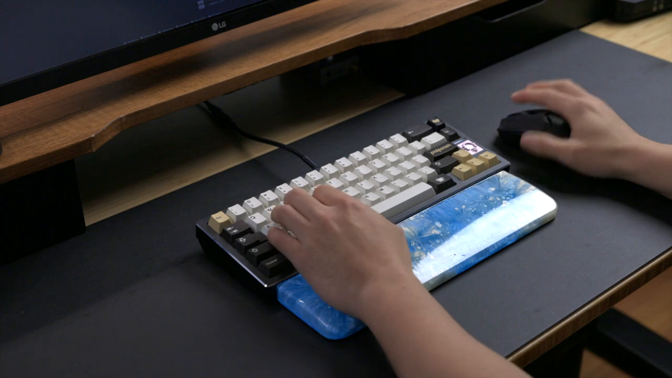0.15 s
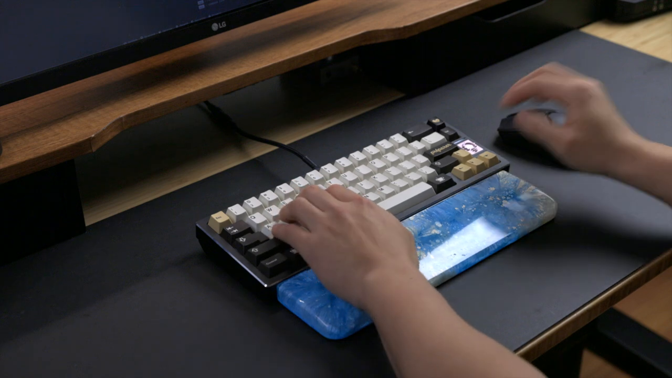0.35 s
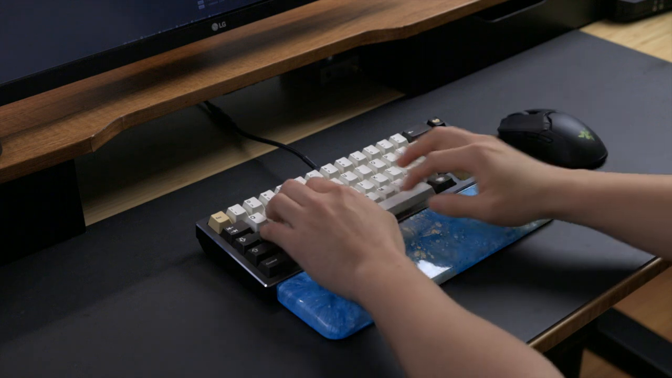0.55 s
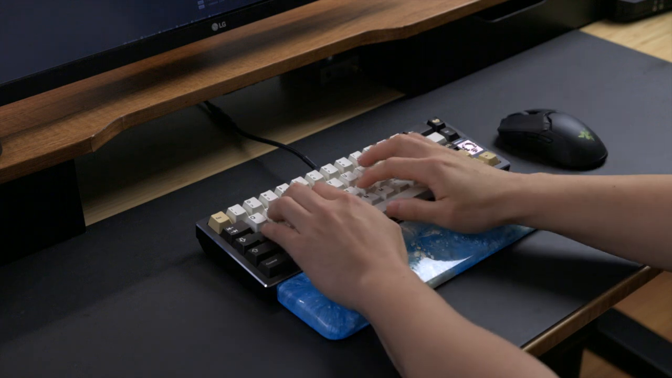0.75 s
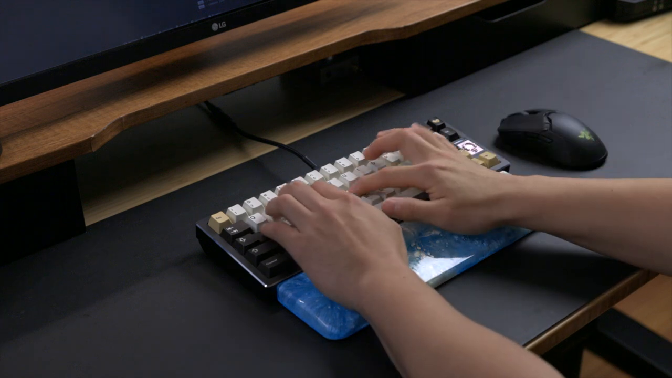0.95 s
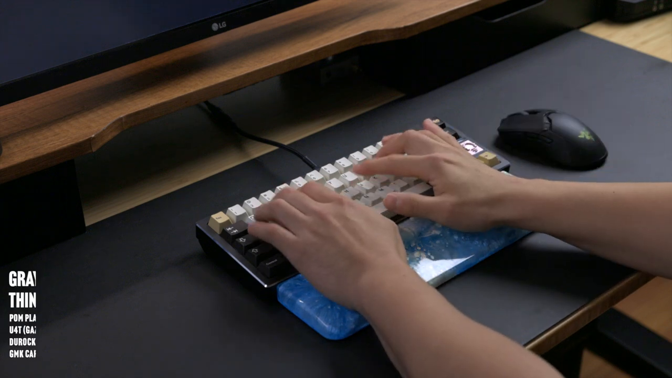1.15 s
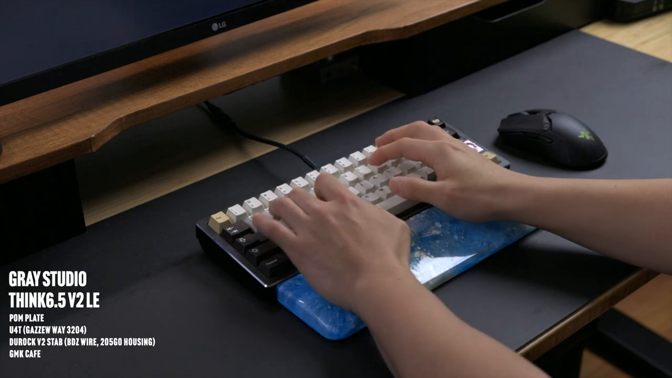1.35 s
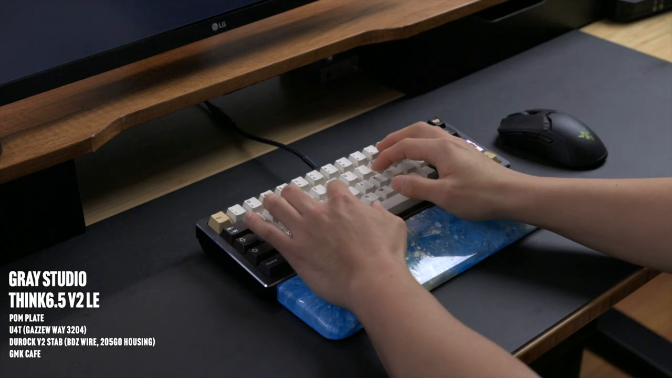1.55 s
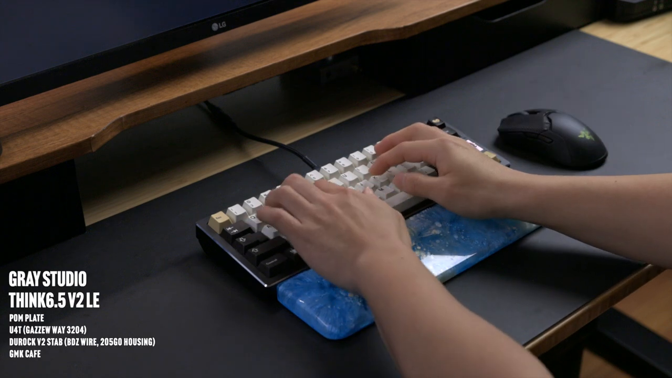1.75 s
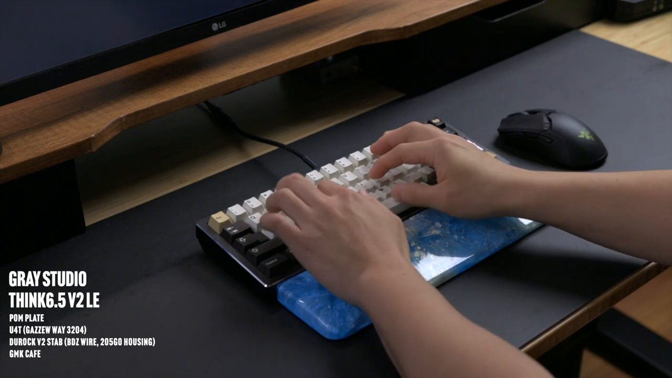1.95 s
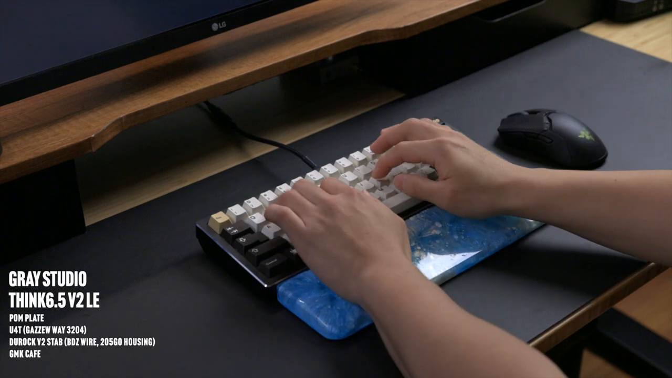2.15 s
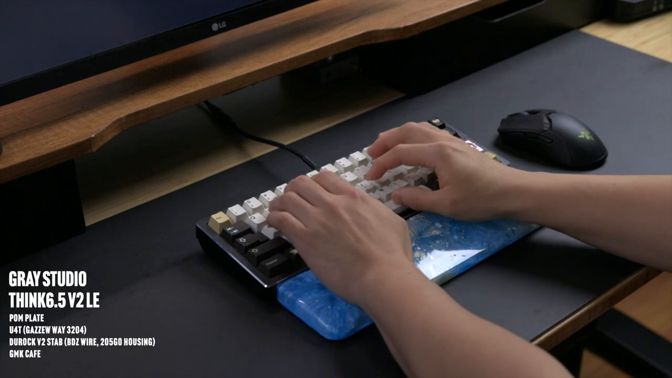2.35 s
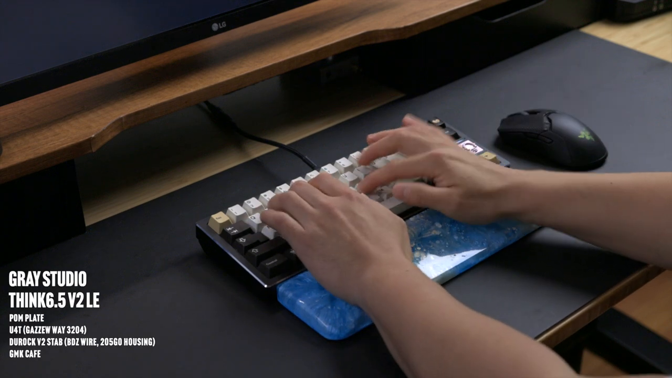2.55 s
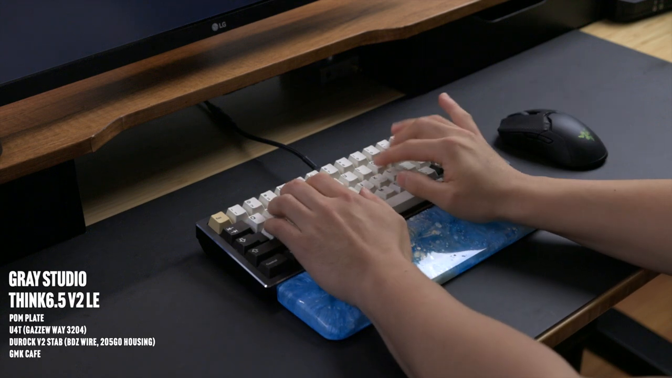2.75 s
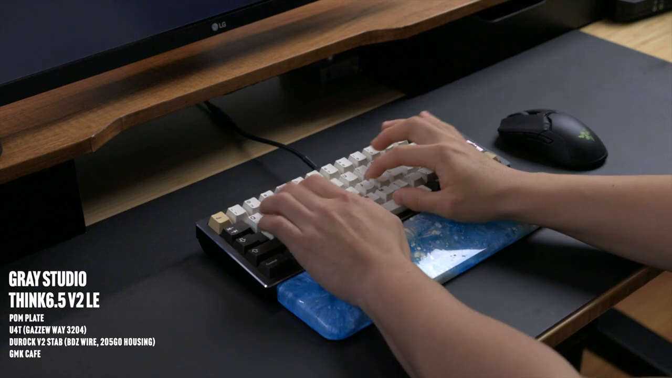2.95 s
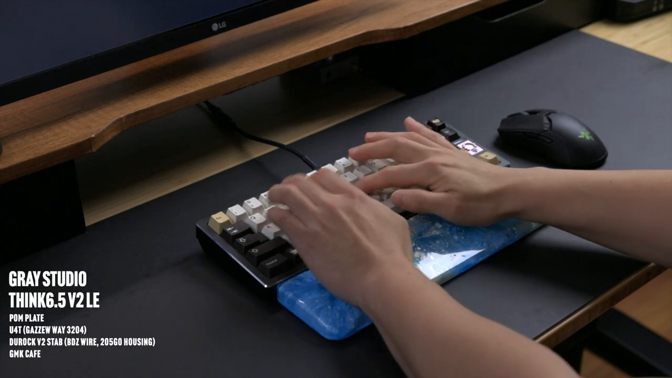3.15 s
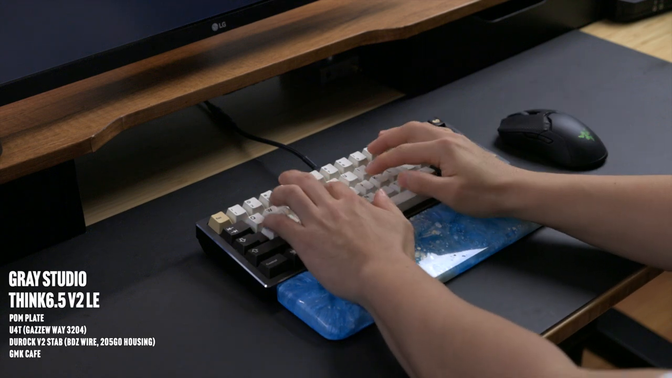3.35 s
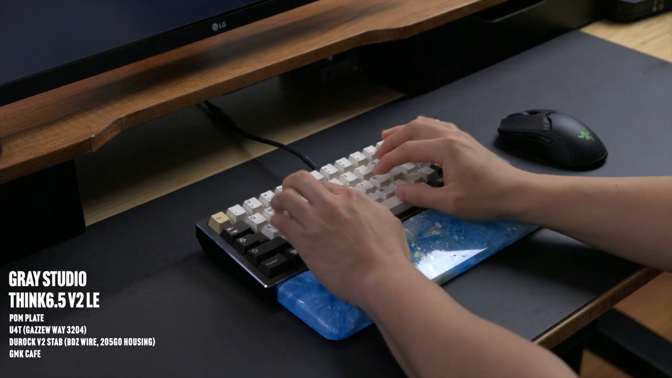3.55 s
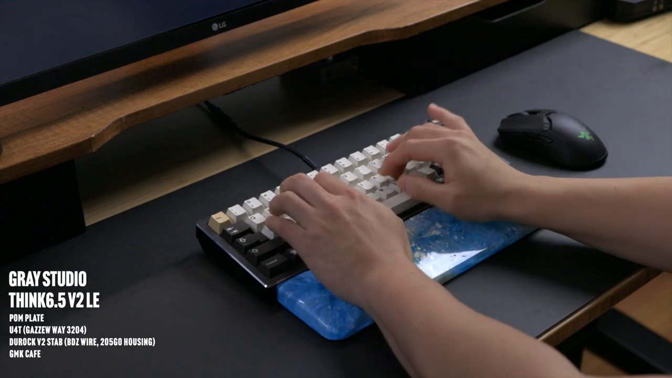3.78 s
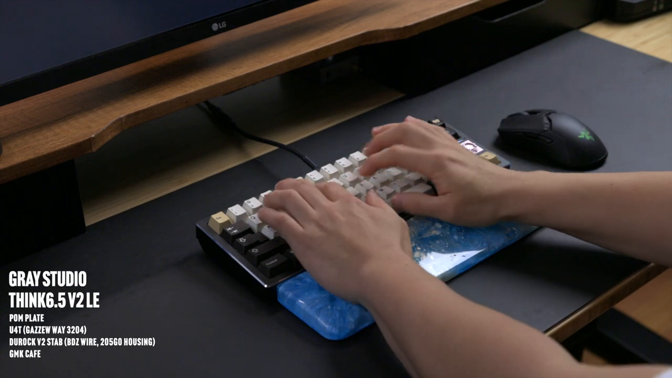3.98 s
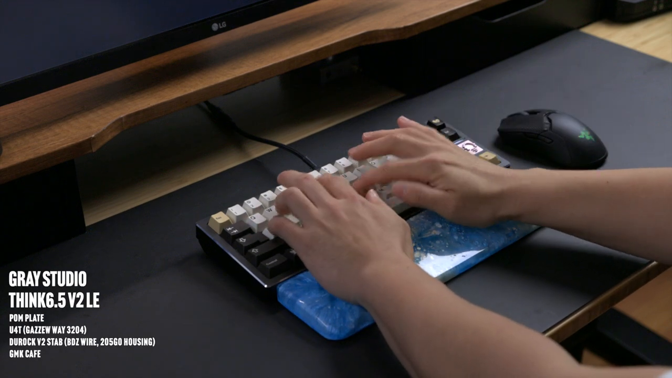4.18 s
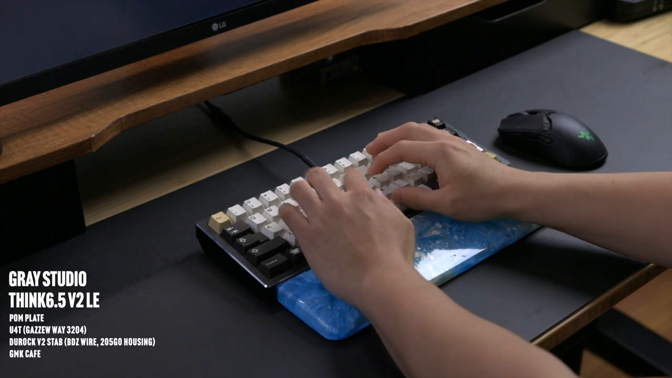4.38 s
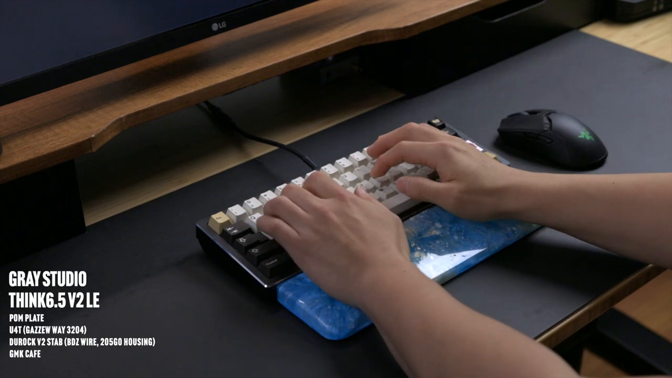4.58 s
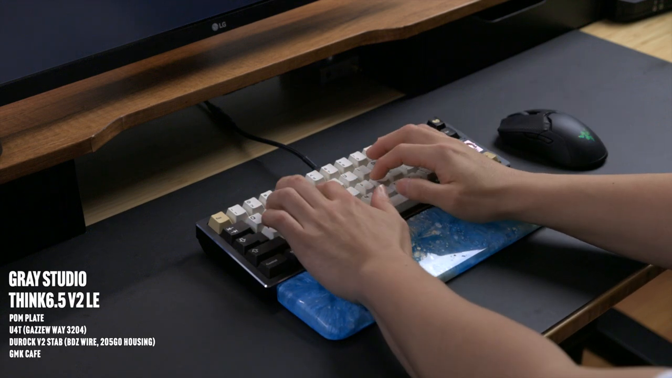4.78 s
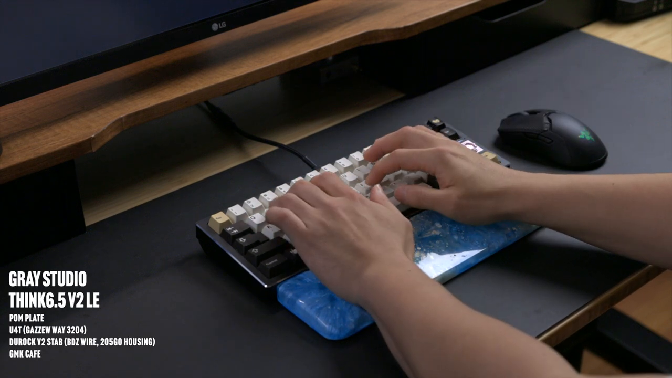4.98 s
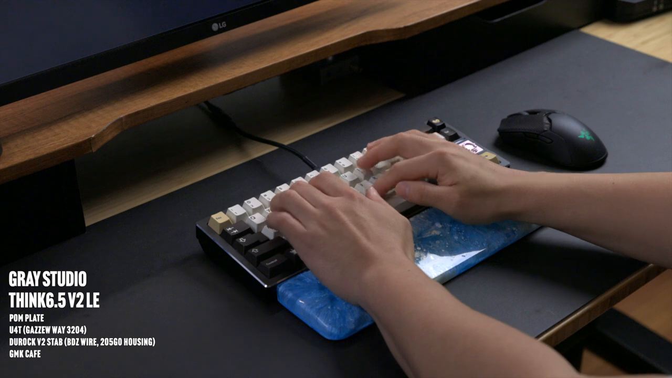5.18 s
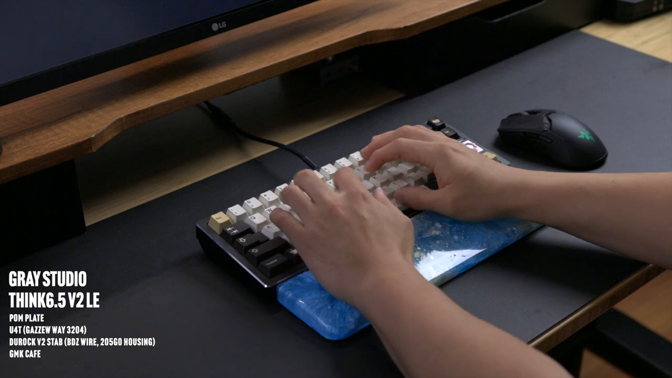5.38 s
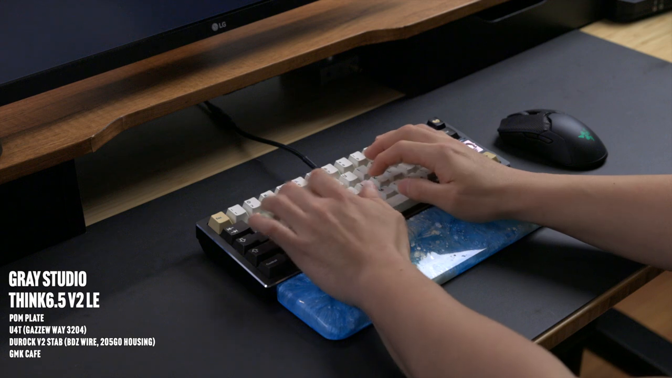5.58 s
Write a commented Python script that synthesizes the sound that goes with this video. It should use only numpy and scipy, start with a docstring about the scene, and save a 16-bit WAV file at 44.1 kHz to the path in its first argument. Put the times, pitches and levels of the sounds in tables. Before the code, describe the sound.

A faint skin rustle and tiny plastic ticks as a hand leaves a mouse, then a short quiet gap with low fan hum. From about 0.8 seconds, rapid mechanical typing runs to the end: short hollow plastic clacks, light finger taps, and fuller space-bar knocks. Close microphone, small damped room, wooden desk.

```python
"""Small damped room, wooden desk: fast typing on a mechanical keyboard close to one microphone.
Each contact rings the hollow keycap, the soft plate under the switches and the stem as decaying modes,
then thumps the desk top; shaped noise swells faintly around it and gives the rattle of loose keys and case.
A fan hums as wavering sines over noise for room air; at first a hand slides off the mouse, as grainy
noise with ticks."""
import sys
import numpy as np
from scipy import signal
from scipy.fft import rfft, irfft, next_fast_len
from scipy.io import wavfile
from scipy.ndimage import map_coordinates

SR = 44100
rng = np.random.default_rng(int(sys.argv[2]) if len(sys.argv) > 2 else 0)


def linear_from_db(decibels):
    """Turn decibels (scalar or array-like) into linear amplitude factors; 0 gives 1."""
    return 10 ** (np.asarray(decibels, float) / 20)


def generate_wav(sig):
    """Save sig (samples, or channels by samples) to the path in sys.argv[1] as 16-bit PCM at SR."""
    pcm = np.round(np.clip(np.atleast_2d(sig).T, -1, 1) * 32767).astype(np.int16)
    wavfile.write(sys.argv[1], SR, pcm)


N = 247842

# Louder letter-key contacts, some of them bounces or ringing on. Each row: start in seconds,
# cap level in dB, cap pitch in Hz, plate level in dB, Hz where the plate rings best under this key,
# stem level in dB, desk level in dB; all levels relative.
LETTER_KEYS = [(0.839, -13, 3034, -16.5, 1510, -31.0, -26), (0.9341, -18.5, 2940, -20, 1630, -33.5, -33.5),
               (0.9785, -12, 3010, -15, 1390, -25.5, -26), (1.0643, -13, 3100, -24.5, 1610, -25, -25.5),
               (1.0759, -18.5, 2950, -22, 1410, -37, -31), (1.1682, -24.5, 3000, -35.5, 1580, -38, -47),
               (1.258, -13.5, 3070, -22, 1750, -30, -23.5), (1.383, -17, 3180, -26.5, 1740, -30, -26.5),
               (1.4029, -18, 3020, -18, 1500, -31.5, -21.5), (1.509, -14.5, 3210, -23, 1810, -32.5, -24),
               (1.5291, -16, 2890, -18.5, 1750, -26.5, -54), (1.6586, -17.5, 3100, -20.5, 1525, -30.5, -27),
               (1.6832, -20.5, 3010, -28, 1800, -40, -57), (1.7508, -24.5, 3100, -28, 1460, -42.5, -34),
               (1.9026, -25.5, 3150, -30, 1550, -46, -45), (2.02, -19.5, 3130, -25, 1800, -38.5, -29),
               (2.089, -17, 3200, -31, 1780, -33, -32.5), (2.121, -20.5, 3050, -31, 1970, -37.5, -44),
               (2.1946, -23.5, 2920, -29, 1840, -43.5, -30), (2.2393, -24.5, 2900, -24, 1580, -43.5, -49),
               (2.3611, -20.5, 2970, -17.5, 1390, -42, -47), (2.4349, -15.5, 3080, -21, 1780, -33, -26),
               (2.4754, -19, 2930, -24.5, 1430, -40, -35), (2.577, -12.5, 3140, -22, 1860, -30.5, -25),
               (2.6563, -14.5, 3000, -24, 2000, -27.5, -32), (2.74, -11.5, 3080, -19.5, 1800, -30, -24.5),
               (2.8202, -14.5, 3050, -38, 1460, -35, -32), (2.9185, -15, 3140, -31, 1780, -28, -24),
               (3.015, -25.5, 2950, -23.5, 1430, -49, -56), (3.0205, -23, 3110, -40, 1710, -39.0, -45),
               (3.025, -35, 3300, -38, 1700, -44, -59), (3.1143, -16, 3320, -22.5, 1510, -30, -59),
               (3.1324, -19, 2920, -21.5, 1490, -40, -32), (3.2275, -17, 2980, -19.5, 1450, -38, -31),
               (3.2467, -26, 3300, -23.5, 1480, -38, -58), (3.3349, -13.5, 2920, -35, 1900, -25.5, -27),
               (3.5174, -16.5, 3350, -21.5, 1470, -36.5, -32), (3.6054, -14.5, 3000, -20, 1600, -33, -26),
               (3.635, -29, 3270, -28, 1480, -46, -62), (3.6707, -26.5, 3230, -27.5, 1860, -44.5, -32.5),
               (3.7303, -17.5, 3207, -31, 1930, -38, -23.5), (3.795, -20, 3330, -21, 1930, -35, -58),
               (3.879, -11.5, 3010, -12, 1510, -25.5, -25.5), (3.9784, -12, 2980, -13, 1420, -30.5, -23.5),
               (4.0021, -18, 2930, -20, 1420, -32, -47), (4.079, -17, 3320, -18.5, 1470, -35.5, -56),
               (4.089, -16.5, 2950, -21.5, 1440, -36, -29), (4.1366, -14, 2950, -13, 1430, -36, -31),
               (4.203, -23, 3230, -23, 1520, -35.5, -31), (4.2377, -18.5, 2920, -31, 1850, -31.0, -30),
               (4.353, -15, 2990, -14.5, 1530, -31, -39), (4.4315, -19.5, 2880, -18.5, 1900, -34, -29),
               (4.5186, -16.5, 3200, -28, 1800, -42.5, -28.5), (4.6122, -17, 3020, -42, 1870, -31.5, -38),
               (4.6645, -10.5, 3020, -12.5, 1520, -23.5, -22), (4.7561, -12.5, 3100, -24, 1750, -25.5, -28),
               (4.7907, -21, 2970, -24, 1640, -43, -33), (4.8463, -18.5, 2900, -23, 1830, -41.5, -26.5),
               (4.9013, -28, 2850, -33, 1740, -44.5, -37), (4.9446, -20.5, 3160, -25.5, 1800, -41, -31.5),
               (5.0018, -14, 3070, -22, 1800, -30, -20.5), (5.094, -23, 3200, -13.5, 1700, -30.5, -36),
               (5.148, -21, 3100, -29, 1710, -39, -30.5), (5.1911, -28, 2540, -26, 1840, -37.5, -31),
               (5.2052, -23, 3010, -20, 1830, -34, -35), (5.3801, -17.5, 2900, -15.5, 1590, -31.0, -34),
               (5.4719, -13, 2780, -15.5, 1880, -24.5, -27), (5.5393, -16, 3230, -25, 1800, -34.5, -23),
               (5.6175, -20, 3080, -44, 2010, -34, -39)]
# Space bar going down, then springing back. Each row: start in seconds, cap level in dB,
# plate level in dB, Hz where the plate rings best, stem level in dB, desk level in dB; levels relative.
SPACE_BAR = [(1.76, -23.5, -12, 1490, -33, -19), (1.8899, -32, -18, 1310, -43, -18.5),
             (2.2181, -21.5, -9, 1600, -33.5, -17), (2.3262, -25.5, -10.5, 1370, -38.5, -15.5),
             (2.8138, -22, -7.5, 1580, -32.0, -16.5), (2.9307, -27.5, -12.5, 1330, -45, -15),
             (3.352, -24, -8.5, 1710, -34, -16.5), (3.4745, -18, -16.5, 1320, -33.5, -17.5),
             (3.78, -24, -10, 1610, -35.5, -18), (3.8968, -26, -10, 1340, -33.5, -13.5),
             (4.21, -32, -13, 1470, -43.0, -19.5), (4.338, -32, -16, 1290, -41, -17),
             (5.2217, -27, -11, 1540, -36, -17.5), (5.3665, -33.5, -17.5, 1280, -40, -21.5)]
# Fingers landing on caps and keys rattling lightly. Each row: start in seconds, relative levels in dB
# of cap, stem and desk.
LIGHT_TOUCHES = [(.816, -50, -55, -62), (0.967, -48, -47, -32), (1.0378, -52, -54, -42),
                 (1.246, -33, -38.5, -35), (1.362, -43, -49, -47), (1.4912, -30, -37.5, -37),
                 (1.6051, -40, -52, -33.5), (1.646, -34, -43, -29), (1.729, -50, -39.5, -57),
                 (1.8844, -33, -38, -58), (2.0017, -36.5, -46, -33), (2.069, -34, -44, -41),
                 (2.2016, -35, -36.5, -49), (2.2594, -46, -60, -35), (2.287, -39, -53, -34),
                 (2.297, -34.5, -47, -35), (2.347, -43, -44, -27.5), (2.424, -28, -38, -48),
                 (2.562, -41, -49, -38), (2.616, -41, -58, -41), (2.6418, -39, -61, -54),
                 (2.667, -44, -48, -43), (2.727, -51, -45, -34), (2.7999, -43, -32, -29.5),
                 (2.827, -36, -60, -57), (2.857, -53, -66, -34), (2.895, -41, -54, -36),
                 (2.9067, -34, -39, -32), (2.999, -45, -48, -51), (3.0078, -37, -51, -45),
                 (3.1052, -30, -39, -35.5), (3.216, -29, -38, -28.5), (3.294, -43, -66, -36),
                 (3.46, -28.5, -33, -27), (3.503, -43, -42, -50), (3.525, -58, -45, -60),
                 (3.59, -42, -43, -31), (3.6581, -43, -59, -39), (3.7597, -33.5, -35.5, -31),
                 (3.852, -36, -48, -43), (3.862, -41, -49, -46), (3.8694, -31, -39, -38),
                 (3.968, -45, -46, -29), (4.0574, -47, -47, -33), (4.1258, -42, -53, -27),
                 (4.1909, -41, -32, -28), (4.5047, -32, -41, -46), (4.513, -40, -58, -59),
                 (4.603, -42, -49, -48), (4.6557, -29, -41, -30), (4.735, -49, -51, -34),
                 (4.826, -51, -49, -32.5), (4.986, -40, -51, -71), (5.0772, -54, -44, -32),
                 (5.1034, -34, -60, -29.5), (5.524, -52, -41, -44), (5.536, -35, -47, -31),
                 (5.6069, -28, -35.5, -29)]
# Modes of switch plate and case. Each row: frequency in Hz, relative level in dB under a letter key,
# relative level in dB under a wide key, t60 in seconds.
PLATE_MODES = [(670, -30, 3, 0.018), (1170, -6.5, -6.5, 0.019), (1368, 0.5, 4.5, 0.013),
               (1482, -4.5, -4.5, 0.024), (1610, 1.5, 2, 0.012), (1800, 9.5, 11, 0.008),
               (2140, 12.5, 1, 0.0042), (2350, 9.5, -23, 0.012)]
# Modes of stem and housing plastic. Each row: as for the plate.
STEM_MODES = [(3800, 15.5, 10, 0.0018), (4530, 6, 8, 0.0064), (5040, 2, 9.5, 0.0052),
              (6150, 3.5, -4, 0.0024), (6960, -3.5, -0.5, 0.006), (7840, 0, -2, 0.0035),
              (8770, 8, 4, 0.0019), (10060, 10.5, -2, 0.0035), (10730, 3.5, -3, 0.0047),
              (12960, -11, -7, 0.004)]
# Modes of the desk top. Each row: as for the plate.
DESK_MODES = [(97, -4.5, -39, 0.038), (130, -1, -6.5, 0.086), (204.6, -26, -18.5, 0.49),
              (192, -1, 3, 0.054), (239, -26, -21, 0.021), (338.3, -36, -14.5, 0.08),
              (607, -42, -25.5, 0.061)]
# Faint noise around each contact. Each row: frequency in Hz, relative density in dB per Hz.
SWELL_SPECTRUM = [(600, -19.5), (1500, 3.5), (3300, -4), (5500, -6), (8000, -15), (10200, -11.5),
                  (13000, -15), (17000, -78)]
# Loose neighbouring keys and case after a blow. Each row: frequency in Hz, relative density in dB per Hz.
BUZZ_SPECTRUM = [(500, -6), (900, -1), (1400, 4.5), (2300, 2.5), (3300, -1), (4800, -3), (6500, -16),
                 (10000, -14), (13000, -53), (17000, -41)]
# Hand sliding off the mouse. Each row: time in seconds, level in dB before the grain.
HAND_LEVEL = [(0.0, -61), (0.084, -58.5), (0.1, -66), (0.118, -58), (0.126, -59.5), (0.236, -82),
              (0.244, -73), (0.3, -91)]
# Skin on the mouse. Each row: frequency in Hz, relative density in dB per Hz.
SKIN_SPECTRUM = [(530, -44), (900, -17), (1070, -11), (1880, -9), (2470, -17), (4740, -14.5), (9200, -20.5),
                 (16000, -33)]
# Faint ticks of the mouse shell. Each row: start in seconds, relative level in dB, frequency in Hz.
MOUSE_TICKS = [(.028, -51, 3340), (0.043, -50, 1370), (.068, -50, 7300), (.074, -46, 4720),
               (.07, -54, 1800), (0.08, -46, 1900), (.11, -46, 1930), (.117, -39.5, 1880),
               (.148, -52, 1400), (.25, -58, 4020), (.308, -58, 3370), (.575, -56, 3300)]
# Near surfaces. Each row: delay in seconds, level in dB.
NEAR_ECHOES = [(.009, -22), (0.0118, -24.5), (0.0204, -28.5)]
# Reverberation of the room. Each row: frequency in Hz, t60 in seconds.
ROOM_T60 = [(300, 1), (1200, 0.58), (3000, 0.47), (6000, 0.65), (12000, 0.27)]
# Fan lines. Each row: frequency in Hz, relative level in dB.
FAN_LINES = [(59.9, -54), (119.8, -47), (202, -69), (239.8, -64.5)]
# Room air and microphone hiss. Each row: frequency in Hz, relative density in dB per Hz.
AIR_SPECTRUM = [(15, -18), (40, -8), (53, 4), (62, 1.5), (75, -8), (100, -10.5), (160, -14), (240, -17.5),
                (320, -21), (620, -20.5), (920, -26), (1150, -23.5), (1860, -32), (3840, -36.5),
                (10000, -42), (16000, -41)]
# Microphone response. Each row: frequency in Hz, gain in dB.
MIC_RESPONSE = [(20, -10), (45, -3), (90, 0), (13000, 0), (15500, -3), (16200, -8), (16600, -50)]


def unit(x):
    """Scales to rms 1."""
    return x / np.sqrt(np.mean(x ** 2) + 1e-20)


def along(points, hz):
    """Interpolates (Hz, value) points on a log frequency axis."""
    point_hz, value = np.transpose(points)
    return np.interp(np.log(hz + 1), np.log(point_hz + 1), value)


def wobble(knots_per_s):
    """Smooth random curve through normal knots."""
    knots = rng.standard_normal(int(N * knots_per_s / SR) + 4)
    return map_coordinates(knots, [np.arange(N) * knots_per_s / SR])


def filtered(x, response):
    """Multiplies the spectrum of x by a complex response of frequency."""
    size = next_fast_len(N + 8192)
    hz = np.fft.rfftfreq(size, 1 / SR)
    return irfft(rfft(x, size) * response(hz), size)[..., :N]


def coloured(spectrum):
    """Noise of rms 1 with the given spectrum."""
    return unit(filtered(rng.standard_normal(N), lambda hz: linear_from_db(along(spectrum, hz))))


def steep(x, hz, kind):
    """Causal fourth-order Butterworth filter."""
    return signal.sosfilt(signal.butter(4, hz, kind, fs=SR, output="sos"), x)


def ring(t, hz, db, t60_s, rise_s):
    """One mode that swells while the contact lasts, then dies."""
    return linear_from_db(db - 60 * t / t60_s) * (1 - np.exp(-t / rise_s)) * np.sin(2 * np.pi * hz * t)


def add(track, start_s, sound):
    """Mixes a sound in at a time."""
    part = track[round(start_s * SR):][:len(sound)]
    part += sound[:len(part)]


def contacts():
    """Contacts as (s, cap dB, cap Hz, plate dB, stem dB, desk dB, plate Hz, 1 for a wide key)."""
    rows = [(s, cap_db, cap_hz, plate_db, stem_db, desk_db, plate_hz, 0)
            for s, cap_db, cap_hz, plate_db, plate_hz, stem_db, desk_db in LETTER_KEYS]
    for s, cap_db, plate_db, plate_hz, stem_db, desk_db in SPACE_BAR:
        cap_hz = 3100 * rng.uniform(0.817, 1.18)
        rows.append((s, cap_db, cap_hz, plate_db, stem_db, desk_db, plate_hz, 1))
    # a letter key's slack closes 4 to 6 ms before each louder contact
    slack = [(s - rng.uniform(0.004, 0.006), cap_db - 35, cap_db - 45, -37.5)
             for s, cap_db, *_ in LETTER_KEYS]
    for s, cap_db, stem_db, desk_db in [*LIGHT_TOUCHES, *slack]:
        cap_hz, plate_hz = rng.uniform(2670, 4180), rng.uniform(1300, 1900)
        plate_db = cap_db - 4.5 + 1.5 * rng.normal()
        rows.append((s, cap_db, cap_hz, plate_db, stem_db, desk_db, plate_hz, 0))
    return rows


def chatter(softness):
    """A first touch, then tiny rebounds scattered over milliseconds; light contacts chatter more."""
    taps = np.zeros(SR // 150)
    taps[0] = 1
    delay, size = rng.uniform(0.05, 1, 12), rng.normal(0, 1, 12)  # delay as a share of the taps
    rebounds = size * (0.065 + 0.3 * softness) * linear_from_db(-12 * delay)
    np.add.at(taps, (delay * (len(taps) - 1)).astype(int), rebounds)
    return taps / np.linalg.norm(taps)


def key_clicks(keys):
    """Cap, plate and stem modes ring together at every contact, at slightly new strengths and pitches."""
    undamped_cap_t60_s, finger_damping_db = 0.0077, 2.5
    snap_db, snap_t60_s = -3, 0.0021  # bright snap at the first instant
    focus_db, max_loss_db = 48, 12  # plate loss one octave off its best Hz, and its ceiling
    out, t = np.zeros(N), np.arange(SR // 20) / SR
    detune = lambda: rng.normal(1, 0.02)
    uneven_db = lambda: rng.normal(0, 2)
    for s, cap_db, cap_hz, plate_db, stem_db, _, plate_hz, wide in keys:
        softness = np.clip((-18.5 - max(cap_db, plate_db)) / 14, 0, 1)

        # a lightly touched cap is damped by the finger
        damping_db = uneven_db() / 2 + finger_damping_db * softness
        cap = ring(t, cap_hz, 8.97, undamped_cap_t60_s * linear_from_db(-damping_db), 0.00023)
        # a weaker neighbour beats against the cap wall's main mode
        cap += ring(t, cap_hz * rng.uniform(1.064, 1.237), 7.0, 0.006, 0.00079)

        plate = np.zeros(len(t))
        for hz, letter_db, wide_db, t60_s in PLATE_MODES:
            loss_db = np.minimum(focus_db * np.log2(hz / plate_hz) ** 2, max_loss_db)
            mode_db = letter_db + wide * (wide_db - letter_db) - loss_db + uneven_db()
            plate += ring(t, hz * detune(), mode_db, t60_s, 0.00093)

        stem = np.zeros(len(t))
        for hz, letter_db, wide_db, t60_s in STEM_MODES:
            mode_db = letter_db + wide * (wide_db - letter_db) + 1.35 * uneven_db()
            stem += rng.choice([-1, 1]) * ring(t, hz * detune(), mode_db, t60_s, 0.00021)
        snap = np.convolve(rng.standard_normal(len(t)), [1, 1, -1, -1], "same")
        stem += linear_from_db(snap_db - 60 * t / snap_t60_s) * snap

        click = -linear_from_db(cap_db) * cap - linear_from_db(plate_db - 3.5) * plate + linear_from_db(stem_db + 1.0) * stem
        add(out, s, signal.fftconvolve(click, chatter(softness)))
    return out


def desk_thumps(keys):
    """The blow reaches the desk through case and mat milliseconds later, each key type weighting its modes."""
    out, t = np.zeros(N), np.arange(SR // 3) / SR
    mat = 1 - np.exp(-t / 0.000069)  # the soft mat rounds the push
    for s, *_, desk_db, _, wide in keys:
        thump = np.zeros(len(t))
        for hz, letter_db, wide_db, t60_s in DESK_MODES:
            mode_db = letter_db + wide * (wide_db - letter_db) + rng.normal(0, 1.6)
            thump += ring(t, hz * rng.normal(1, 0.012), mode_db, t60_s, 0.0035)
        add(out, s + 0.00414 - 0.0012 * wide, linear_from_db(desk_db + 3) * mat * thump)
    return out


def noise_swells(keys):
    """Faint noise swells for milliseconds before each contact and fades after it."""
    level, t = np.zeros(N), np.arange(-SR // 50, SR // 50) / SR
    slope_db = np.where(t < 0, -14 + 60 * t / 0.024, -2 - 60 * t / 0.026)
    for s, _, _, _, stem_db, *_ in keys:
        add(level, s + t[0], linear_from_db(stem_db + slope_db))
    return level * coloured(SWELL_SPECTRUM)


def loose_buzz(keys):
    """Every blow shakes the neighbouring keys and the case into a brief dense rattle."""
    power, t = np.zeros(N), np.arange(SR // 5) / SR
    swell_and_decay = (1 - np.exp(-t / 0.0032)) * linear_from_db(-30.5 - 60 * t / 0.13) ** 2
    for s, cap_db, _, plate_db, *_ in keys:
        add(power, s, (linear_from_db(cap_db) ** 2 + linear_from_db(plate_db) ** 2) * swell_and_decay)
    grains = unit(linear_from_db(5.4 * wobble(350)))  # separate small parts knock unevenly
    return np.sqrt(power) * grains * coloured(BUZZ_SPECTRUM)


def room(x):
    """Near surfaces each return a smeared copy; a diffuse tail decays, new for each tenth of a second."""
    out, step = np.zeros(N), SR // 10
    decay = linear_from_db(-60 * np.arange(SR // 100) / SR / 0.012)
    smear = decay / np.linalg.norm(decay)
    for start in range(0, N, step):
        hz, t, bins = signal.stft(rng.standard_normal(SR // 2), SR, nperseg=128)
        fade = linear_from_db(-60 * t / along(ROOM_T60, hz)[:, None])
        tail = signal.istft(bins * fade, SR, nperseg=128)[1]
        tail *= linear_from_db(-19) / np.linalg.norm(tail)
        for delay_s, db in NEAR_ECHOES:
            add(tail, delay_s, linear_from_db(db) * smear * rng.standard_normal(len(smear)))
        add(out, start / SR, signal.fftconvolve(x[start:start + step], tail))
    return out


def hand_off_mouse():
    """Skin rubs the mouse in uneven grains of noise and its shell ticks as short modes."""
    time_s, level_db = np.transpose(HAND_LEVEL)
    grain_db = 3.5 * wobble(200)
    level = linear_from_db(np.interp(np.arange(N) / SR, time_s, level_db, right=-120) + grain_db)
    out, t = level * coloured(SKIN_SPECTRUM), np.arange(SR // 40) / SR
    for s, db, hz in MOUSE_TICKS:
        add(out, s, ring(t, hz, db, 0.016, 0.00046))
    return out


def fan_and_air():
    """Fan lines waver slightly in level and phase over nearly steady room air and hiss."""
    t, fan = np.arange(N) / SR, np.zeros(N)
    for hz, db in FAN_LINES:
        level = linear_from_db(db + 1.0 + 0.8 * wobble(6))
        fan += level * np.sin(2 * np.pi * hz * t + 0.12 * wobble(3.6))
    air_db = -54 + 0.093 * wobble(3.7)
    return fan + linear_from_db(air_db) * coloured(AIR_SPECTRUM)


def scene():
    """All reaches one microphone; the small keyboard radiates no bass, the heavy desk no treble."""
    keys = contacts()
    struck = steep(key_clicks(keys), 920, "high") + noise_swells(keys)
    struck += steep(desk_thumps(keys), 1020, "low")
    mix = struck + room(struck) + loose_buzz(keys) + hand_off_mouse() + fan_and_air()
    return np.tile(mix, (2, 1))


def band_limit(x):
    """A steep low-pass at the top of the band."""
    return signal.sosfilt(signal.butter(12, 16530, fs=SR, output="sos"), x)


def record(dry):
    """Microphone response on both channels; the left lags by about a sample."""
    left_lag_s, phase_corner_hz = 2.1e-5, 1040

    def response(hz):
        half_turn = np.pi * hz * left_lag_s * hz / np.hypot(hz, phase_corner_hz)  # radians
        return linear_from_db(along(MIC_RESPONSE, hz)) * np.exp(1j * half_turn * np.array([[-1], [1]]))

    return band_limit(filtered(dry, response))


dry = scene()
out = record(dry)
generate_wav(out)
```